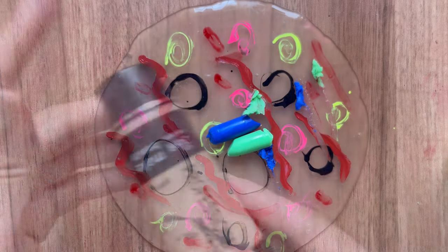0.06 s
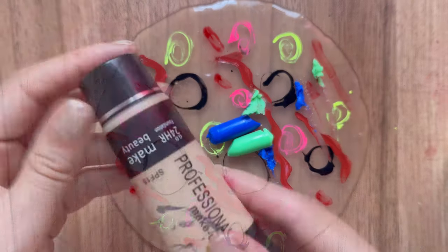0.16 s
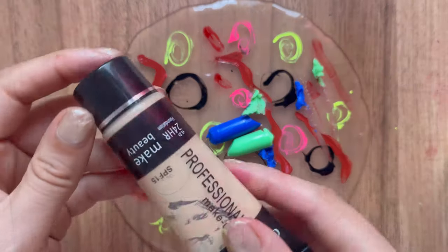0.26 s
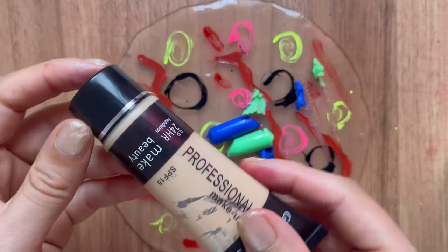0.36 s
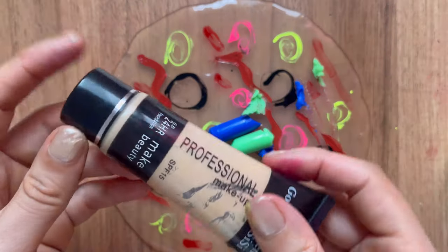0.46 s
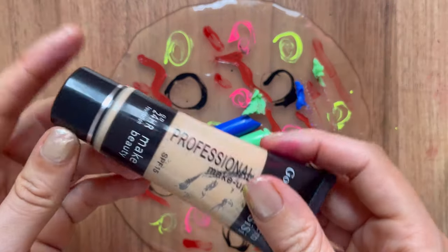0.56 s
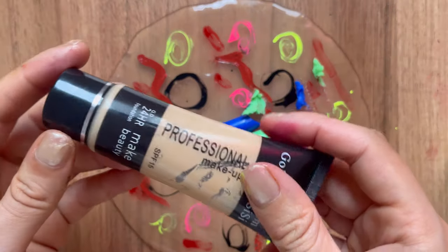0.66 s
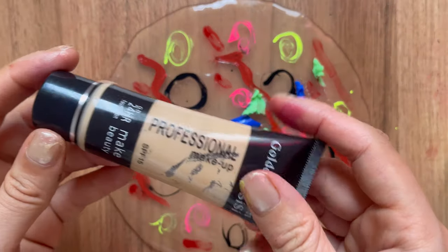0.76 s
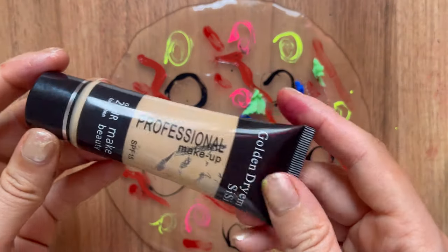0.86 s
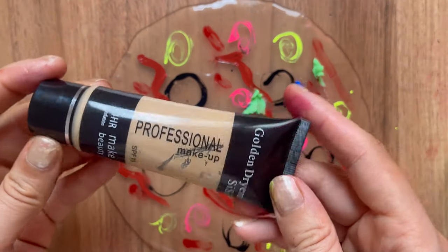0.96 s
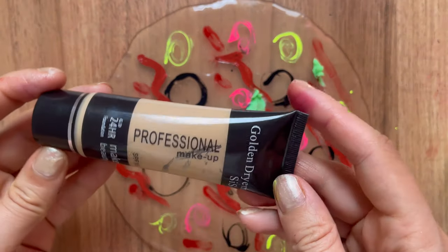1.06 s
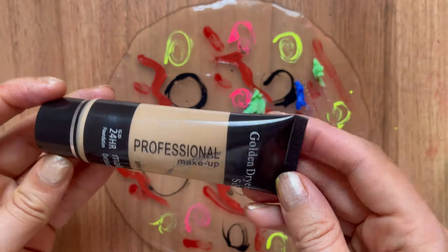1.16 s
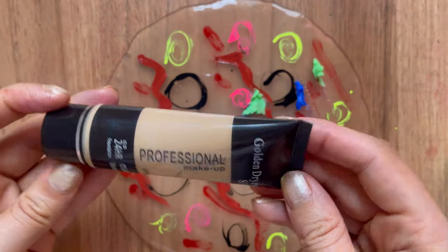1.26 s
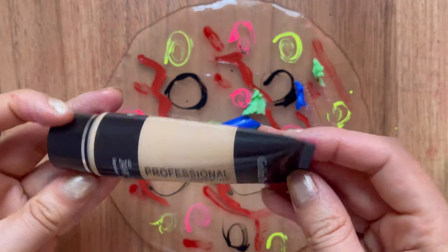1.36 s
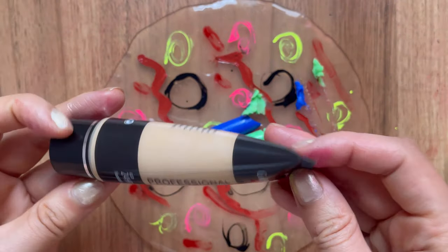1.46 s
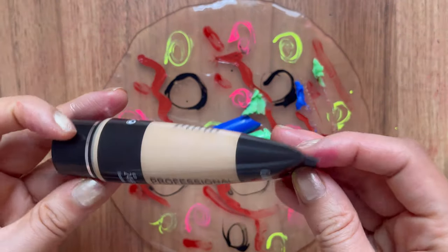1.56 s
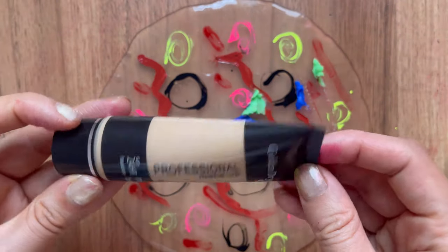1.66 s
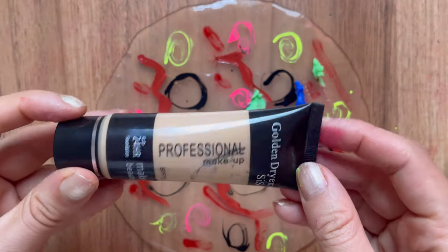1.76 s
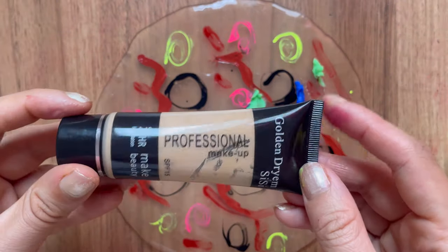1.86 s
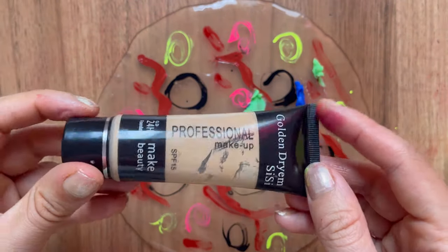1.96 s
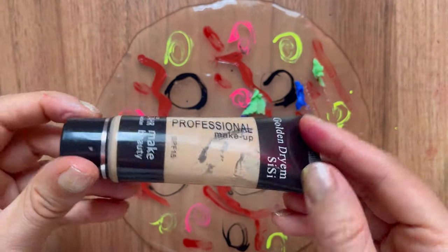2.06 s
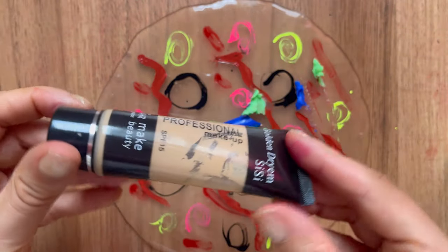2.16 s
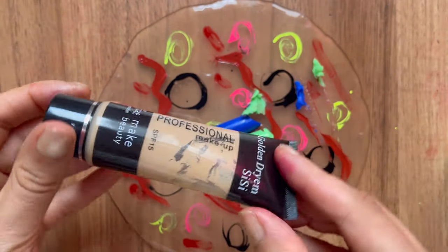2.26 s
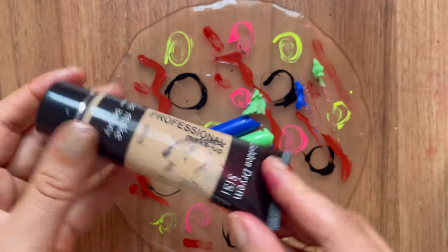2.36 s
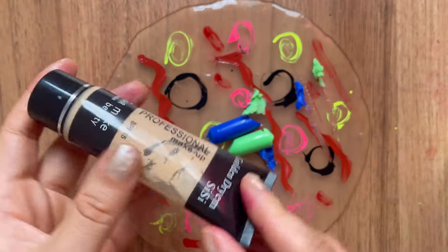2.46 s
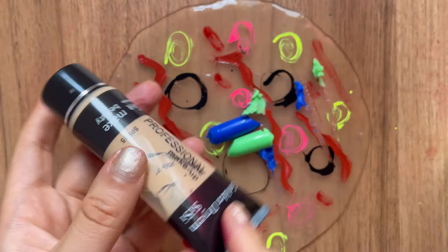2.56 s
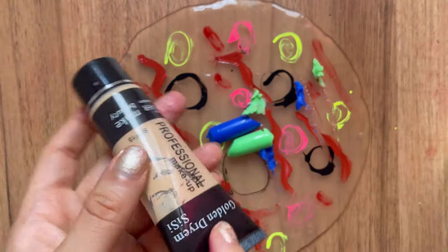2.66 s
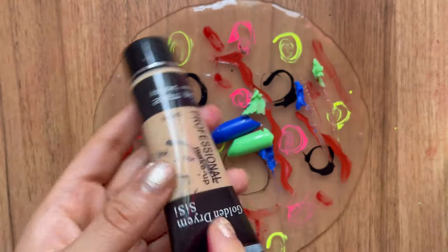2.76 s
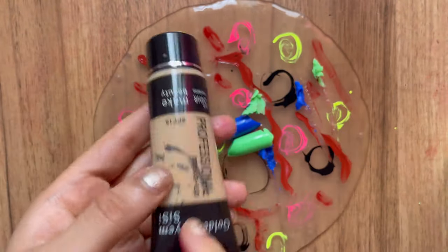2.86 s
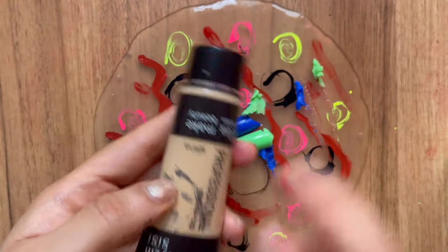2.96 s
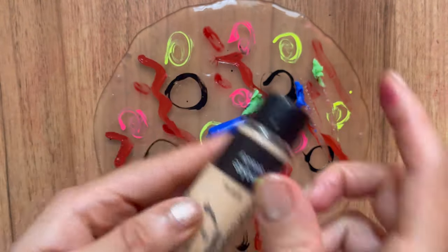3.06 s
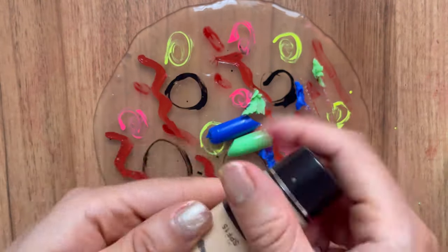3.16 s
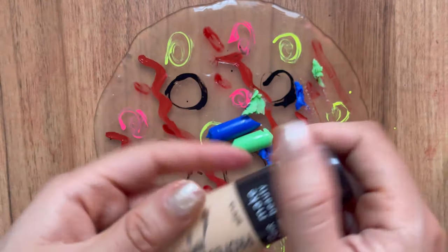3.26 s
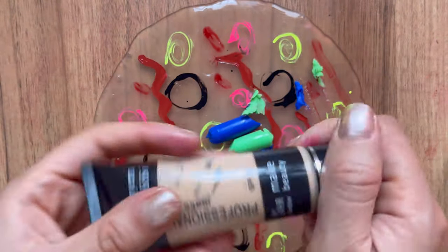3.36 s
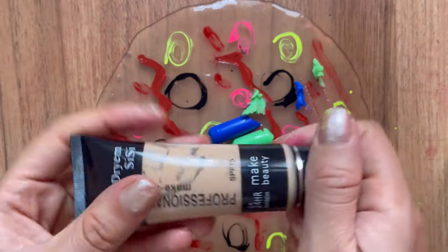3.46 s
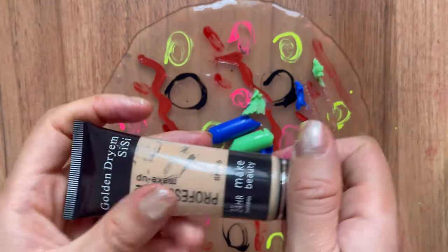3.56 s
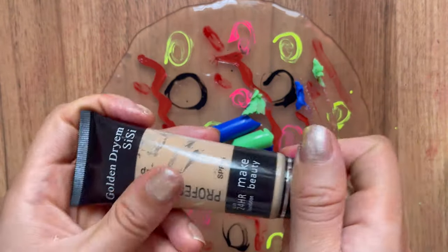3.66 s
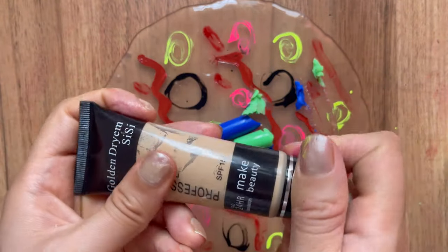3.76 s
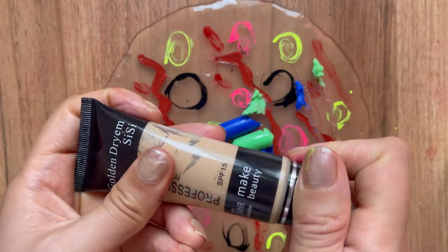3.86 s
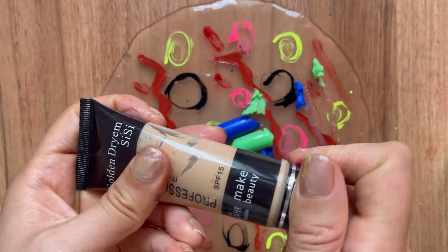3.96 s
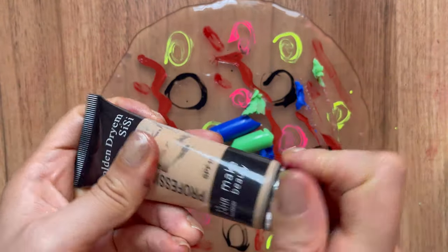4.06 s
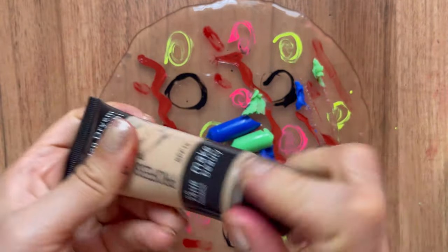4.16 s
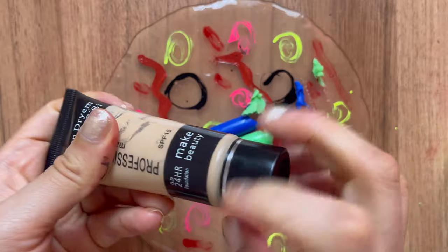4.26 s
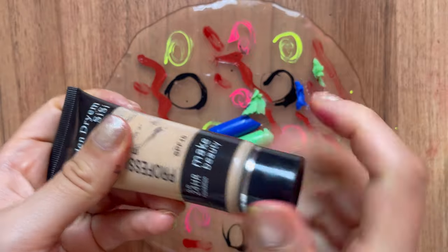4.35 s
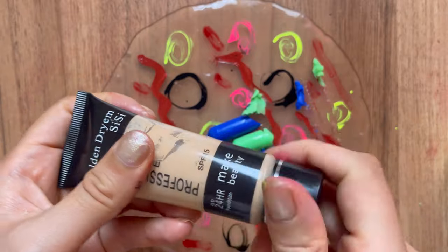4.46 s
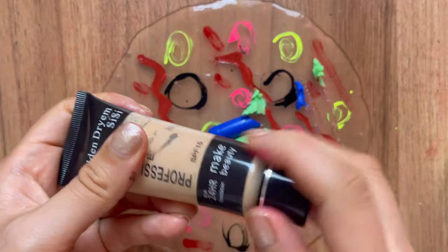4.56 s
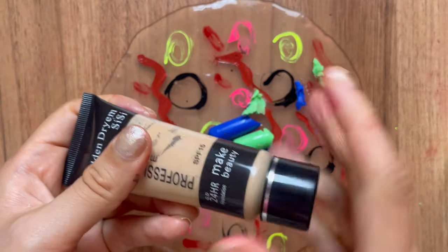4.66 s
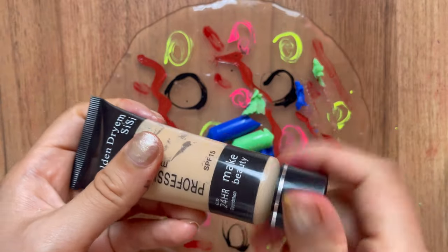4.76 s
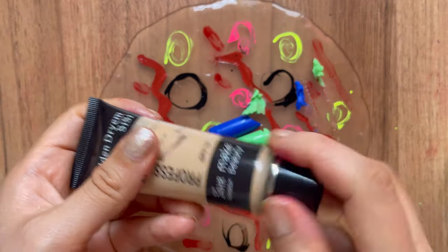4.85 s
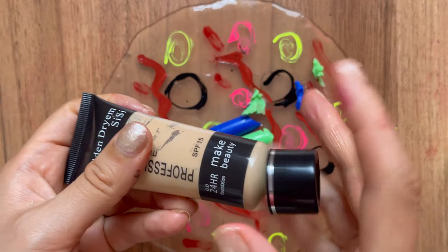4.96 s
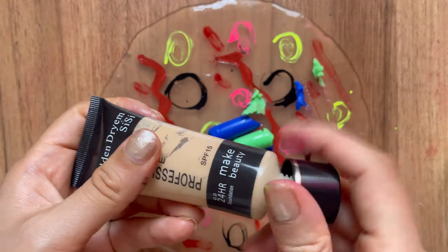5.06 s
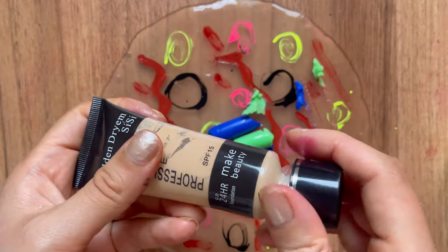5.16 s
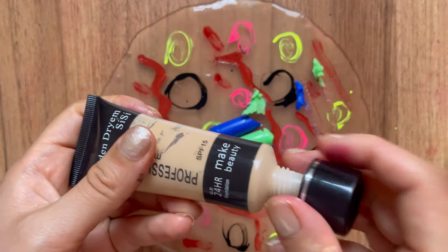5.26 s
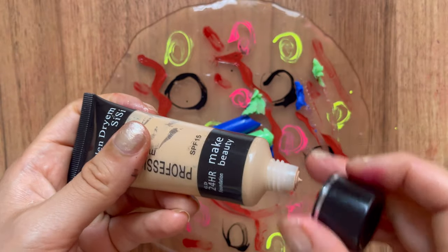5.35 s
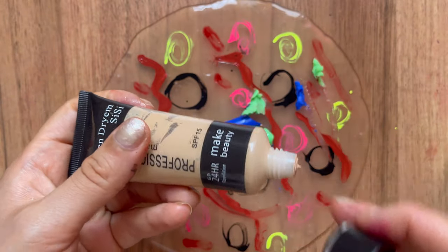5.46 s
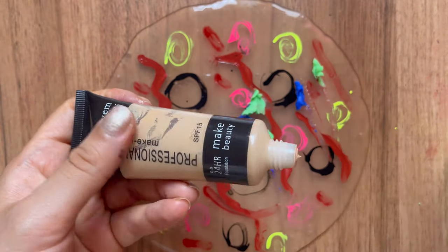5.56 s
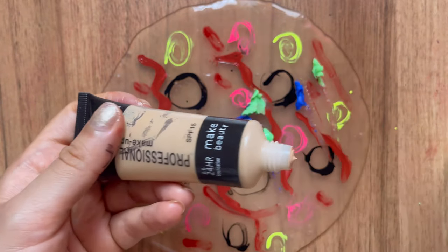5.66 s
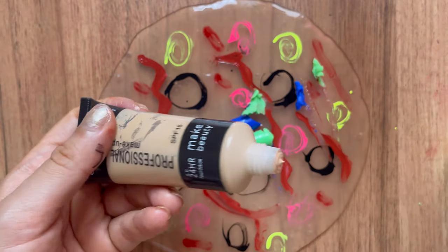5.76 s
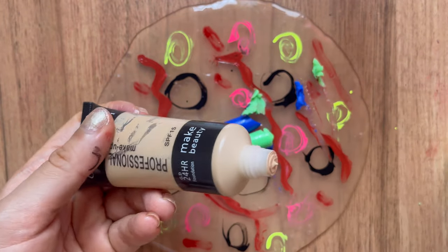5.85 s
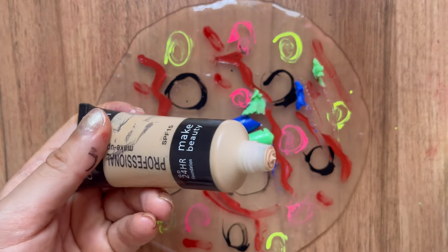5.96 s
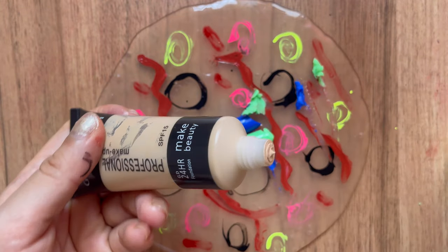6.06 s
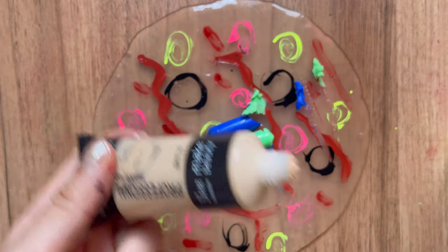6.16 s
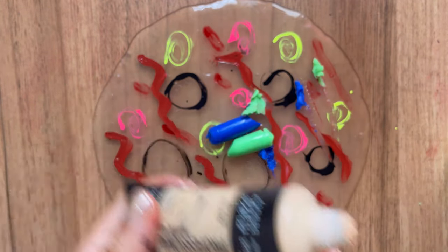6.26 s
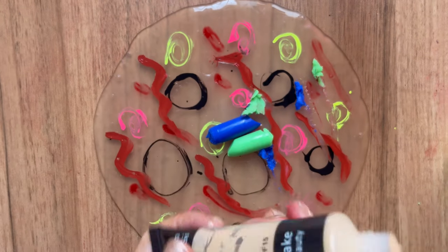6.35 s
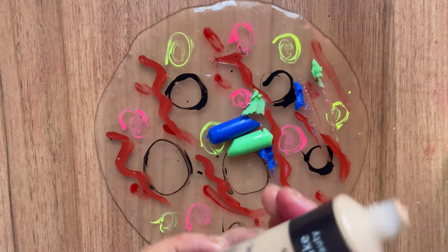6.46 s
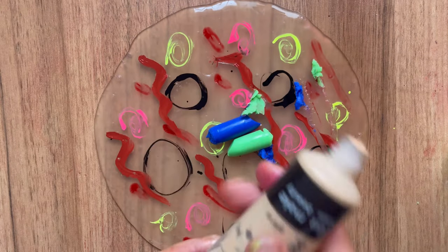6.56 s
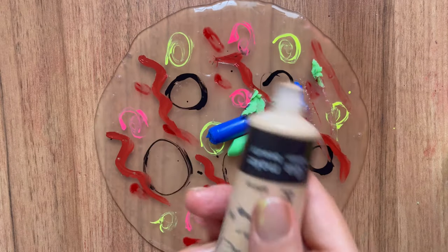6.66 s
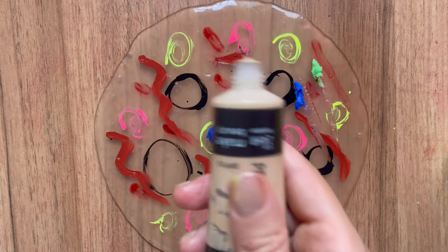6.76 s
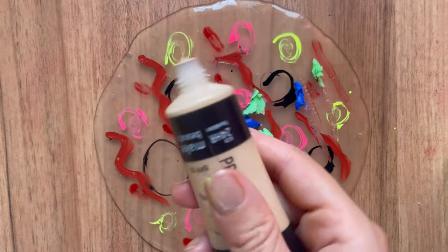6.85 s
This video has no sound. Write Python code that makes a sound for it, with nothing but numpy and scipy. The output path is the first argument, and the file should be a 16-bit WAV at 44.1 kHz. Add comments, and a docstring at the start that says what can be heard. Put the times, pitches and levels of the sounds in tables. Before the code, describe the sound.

Very faint air hiss and low rumble lie under close handling of a plastic makeup tube. Dry skin slides and light nail scuffs lead to one crisp tick, then short thread scrapes and increasingly strong cap clicks. The loudest sound is the cap set down on the table, a hard quick chatter with brief room reflections. Soft rubbing ends it.

```python
"""A soft plastic makeup tube is turned in the hands above a table, heard close by in a quiet room.
Over faint air hiss, fingers slide on it (friction noise) and nails tap and scuff it (dying modes).
A deep hum swells three times; the screw cap scrapes by stick-slip and clicks off its thread (ringing modes).
The cap is set down on the table, where it chatters and rocks flat (struck modes of cap and table top).
A last nail tap and a few slides follow."""
import sys
import numpy as np
from scipy import signal
from scipy.fft import rfft, irfft, next_fast_len
from scipy.io import wavfile
from scipy.ndimage import uniform_filter1d

SR = 44100
rng = np.random.default_rng(int(sys.argv[2]) if len(sys.argv) > 2 else 0)


def store_wav(level_fs):
    """Save 16-bit WAV to argv[1]."""
    pcm = np.round(np.clip(np.atleast_2d(level_fs), -1, 1) * 32767)
    wavfile.write(sys.argv[1], SR, pcm.T.astype(np.int16))


N = 304731
TIME = np.arange(N) / SR  # s

# Modes of the tube, of the cap held in the hand, and of the tube wall and tube neck behind the contacts.
# Each row: frequency in Hz, level in dB, t60 in s. The first row of tube and cap is the note of the hollow.
TUBE_MODES = [(3040, -3, 0.013), (1240, -14.5, 0.0086), (1955, -16.5, 0.0078), (4000, -10, 0.012),
              (5120, -7, 0.013), (6350, -14.5, 0.0095), (8000, -14, 0.0046)]
CAP_IN_HAND_MODES = [(2830, 0.5, 0.0092), (1200, -11, 0.002), (2040, 1, 0.0027), (3970, -18.5, 0.0082),
                     (4400, -28, 0.021), (5000, -8.5, 0.0024), (6400, -9.5, 0.015), (6870, -13.5, 0.011),
                     (11430, -19, 0.019), (12760, -27, 0.005)]
WALL_MODES = [(366, 0.5, 0.017), (554, -2.5, 0.017), (930, -4.5, 0.0061)]
NECK_MODES = [(447, -4.5, 0.011), (863, -3.5, 0.011), (1210, -6.5, 0.01)]


def amp(db):
    """Amplitude ratio of a level: 20 dB for each factor of ten."""
    return 10 ** (np.asarray(db) / 20)


def unit(x):
    """Normalisation of the mean power: rms 1."""
    return x / np.sqrt(np.mean(x ** 2) + 1e-20)


def read(points, hz):
    """Interpolation of a table along a logarithmic frequency axis."""
    point_hz, value = np.transpose(points)
    return np.interp(np.log(hz + 1), np.log(point_hz + 1), value)


def colour(x, spectrum):
    """Spectral shaping: each frequency of x is weighted by the table in dB, then set to rms 1."""
    hz = np.fft.rfftfreq(len(x), 1 / SR)
    return unit(irfft(rfft(x) * amp(read(spectrum, hz)), len(x)))


def band(x, lo_hz, hi_hz, order=2):
    """Causal Butterworth band-pass."""
    sos = signal.butter(order, [lo_hz, hi_hz], "band", fs=SR, output="sos")
    return signal.sosfilt(sos, x)


def add(mix, start_s, sound):
    """Superposition: adds a sound to the mix in place from start_s."""
    part = mix[round(start_s * SR):][:len(sound)]
    part += sound[:len(part)]


def drift(span_s):
    """Random wandering at rms 1: noise under a moving average of span_s."""
    return unit(uniform_filter1d(rng.standard_normal(N), round(span_s * SR)))


def swell(length_s, rise, peakedness):
    """One smooth push: up over the share `rise` of its length, then back to rest; low peakedness is flat-topped."""
    progress = np.linspace(0, 1, round(length_s * SR))
    height = np.interp(progress, [0, rise, 1], [0, 1, 0])
    return np.sin(np.pi / 2 * height) ** peakedness


def grains(size, per_s, spread_db):
    """Stick-slip as random impulses: tiny slips at random moments, a few much larger than the rest."""
    slips = rng.random(size) < per_s / SR
    height = np.minimum(rng.exponential(1, size), 4)
    sign = rng.choice([-1, 1], size)
    return slips * sign * amp(spread_db * height)


def ring(modes, hollow_db=0, tuning=1, spread_db=1, detune=0.034, attack_s=.00008):
    """Modal decay: a sum of dying sines; hollow_db and tuning set the first, chance varies the others."""
    t = TIME[:SR // 20]
    hz, db, t60 = np.array(modes, float).T
    first = np.arange(len(hz)) == 0
    pitch_chance, level_chance = rng.standard_normal((2, len(hz)))
    hz = hz * np.where(first, tuning, 1 + detune * pitch_chance)
    alternating_sign = (-1) ** np.arange(len(hz))
    gain = amp(db + np.where(first, hollow_db, spread_db * level_chance)) * alternating_sign
    decay = np.exp(-np.log(1000) * t / t60[:, None])
    partials = np.sin(2 * np.pi * hz[:, None] * t) * decay
    return gain @ partials * (1 - np.exp(-t / attack_s))


def contacts(rows, modes, backing, crack_s, tuning=None):
    """Impact: each contact rings the object, thuds into what is behind it and cracks at the point of touch."""
    out, t = np.zeros(N), TIME[:SR // 20]
    for start_s, db, hollow_db, thud_db, crack_db in rows:
        burst = rng.standard_normal(len(t)) * np.exp(-t / crack_s)
        crack = band(burst, 1536, 5900, order=1)
        pitch_factor = np.interp(start_s, *np.transpose(tuning)) if tuning else 1
        note = ring(modes, hollow_db, pitch_factor)
        thud = ring(backing)
        add(out, start_s, amp(db) * (note + amp(thud_db) * thud + amp(crack_db) * crack))
    return out


def air_hiss():
    """Stationary coloured noise: room air and hiss, a little lower at first, then steady."""
    # Spectrum of the air, with a thin whine in the hiss. Each row: frequency in Hz, level in dB.
    air_spectrum = [(60, 5.5), (150, -1), (210, 6.5), (270, 1.5), (350, -5), (450, -3.5), (600, -7),
                    (1000, -12), (2000, -17.5), (4850, -19.5), (5080, -12.5), (5350, -21), (7000, -19.5),
                    (9500, -24), (15500, -24.5)]
    # Level of the air over time. Each row: time in seconds, level in dB.
    air_level = [(.3, -68.5), (.62, -66)]
    level_db = np.interp(TIME, *np.transpose(air_level))
    return amp(level_db) * colour(rng.standard_normal(N), air_spectrum)


def rumble(level_db=-52.5, drift_db=1, drift_s=.4):
    """Low-frequency coloured noise whose level drifts slowly."""
    # Spectrum of the rumble. Each row: frequency in Hz, level in dB.
    rumble_spectrum = [(3, -0.5), (8, 11), (16, -3.5), (25, -9.5), (40, -2), (55, -6.5), (75, -17.5),
                       (100, -10), (120, -22.5), (145, -34.5), (220, -56)]
    return amp(level_db + drift_db * drift(drift_s)) * colour(rng.standard_normal(N), rumble_spectrum)


def deep_hum(trim_db=-2.0, hum_hz=35.6, waver_hz=1.15):
    """Frequency modulation: a deep sine wavers in pitch and swells three times."""
    # Swells of the hum. Each row: start in seconds, length in seconds, level in dB before the trim.
    hum_swells = [(3.82, 0.34, -45.5), (4.24, 0.61, -48.5), (4.84, 0.29, -49)]
    phase = 2 * np.pi * np.cumsum(hum_hz + waver_hz * drift(.1)) / SR
    level = np.zeros(N)
    for start_s, length_s, db in hum_swells:
        add(level, start_s, amp(db + trim_db) * swell(length_s, rise=0.44, peakedness=0.67))
    return level * unit(np.sin(phase))


def room(x, wet_db, build_s=0.0043, reflections_per_s=4000):
    """Reverberation of a small room: reflections thicken quickly, then each band dies at its own speed."""
    # Reverberation time of the room. Each row: frequency in Hz, t60 in seconds.
    room_t60 = [(200, 0.61), (1000, 0.34), (2600, 0.42), (6000, 0.27), (14000, 0.36)]
    size = SR // 2
    taps = rng.choice([-1., 1.], size) * (rng.random(size) < reflections_per_s / SR)
    taps *= 1 - np.exp(-TIME[:size] / build_s)
    hz, t, bands = signal.stft(taps, SR, nperseg=256)
    decay = amp(-60 * t / read(room_t60, hz)[:, None])
    tail = signal.istft(bands * decay, SR, nperseg=256)[1]
    return amp(wet_db) * signal.oaconvolve(x, tail / np.linalg.norm(tail))[:N]


def near_echo(x, delay_s, echo_db):
    """Early reflection: the direct sound and its first bounce off a hard surface close by."""
    return x + amp(echo_db) * np.interp(TIME - delay_s, TIME, x, left=0)


def rub(rows, rise, peakedness, slips_per_s=9000, spread_db=3, hump_ratio=1.31,
        hump_db=-2, skin_db=6.5, light_grip_hz=6500, focus_db=4):
    """Dry friction: dense micro-slips of skin on plastic swell and fade around a hump of hiss."""
    # Spectra of the broad friction noise and of the dry fizz. Each row: frequency in Hz, level in dB.
    skin_spectrum = [(100, -23), (400, -4), (1000, -3), (2000, 1), (5000, 2), (7500, 0), (9500, -11.5),
                     (12000, -15.5), (16000, -26.5)]
    fizz_spectrum = [(3000, -41.5), (8000, -10.5), (10000, -5), (12000, -2), (14000, -9), (16000, -18.5)]
    out = np.zeros(N)
    for start_s, length_s, db, centre_hz, fizz_db in rows:
        speed = swell(length_s, rise, peakedness)
        slips = grains(N // 2, slips_per_s, spread_db)[:next_fast_len(len(speed))]
        hump = unit(band(slips, centre_hz / hump_ratio, centre_hz * hump_ratio))
        # the hump stands out by focus_db more per octave away from the hiss of a light grip
        octaves = abs(np.log2(light_grip_hz / centre_hz))
        hiss = amp(hump_db + focus_db * octaves) * hump
        hiss += amp(skin_db) * colour(slips, skin_spectrum)
        hiss += amp(fizz_db) * colour(slips, fizz_spectrum)
        add(out, start_s, amp(db) * speed * unit(hiss)[:len(speed)])
    return out


def fingers(judder_db=1, judder_s=0.0047, regrip_db=3.5, regrip_s=0.08):
    """Modulated friction: slides over the uneven rustle of the rolling tube; the skin judders in both."""
    # Finger slides, then rolls of the tube in the grip. Each row: start in seconds, length in seconds,
    # level in dB before judder and regrip, centre of the hiss in Hz, dry fizz in dB.
    slide_rows = [(.62, 0.22, -75, 3250, -9), (.788, .058, -67.5, 3100, 12), (1.34, .15, -74, 7500, -1),
                  (1.935, .11, -67, 4600, -3), (2.25, 0.2, -69, 7200, 2.5), (2.59, 0.21, -70, 7200, 2.5),
                  (2.786, 0.038, -58, 5300, 4), (2.975, .16, -70, 6400, 4), (3.12, 0.26, -62.5, 5940, 5),
                  (3.225, .07, -67, 2400, -6), (3.41, .16, -68.5, 3550, -1), (3.652, 0.053, -70, 5000, -6),
                  (3.925, 0.15, -61, 4400, -1), (4.02, .16, -59, 6000, 4), (4.065, .08, -61.5, 12900, 21),
                  (4.435, .13, -62.5, 6400, 5), (4.77, .1, -63.5, 6640, -3), (5.46, .07, -68.5, 11600, 5),
                  (6.332, 0.12, -61.5, 6400, -3.5), (6.465, 0.14, -68.5, 6500, 0),
                  (6.71, .18, -72.5, 6400, -3)]
    roll_rows = [(.55, 3.3, -84, 3230, -3), (1.6, .27, -79.5, 7400, -9), (6.25, 0.25, -74, 7500, -0.5)]
    slides = rub(slide_rows, rise=0.34, peakedness=1.55)
    rolls = rub(roll_rows, rise=0.85, peakedness=0.27) * amp(regrip_db * drift(regrip_s))
    return (slides + rolls) * amp(judder_db * drift(judder_s))


def scuffs(slips_per_s=900, spread_db=-1.0, wall_db=-6, body_db=-3):
    """Stick-slip of a nail on the tube wall: quick slips knock ever harder until the nail lets go."""
    # Stutters of the nail. Each row: start in seconds, end in seconds, level in dB,
    # hollow note in dB, factor on the hollow pitch.
    scuff_rows = [(0.78, 0.816, -73, -8, 0.85), (1.785, 1.821, -68, 2, 0.86), (1.905, 1.92, -70.5, 8, 0.8),
                  (2.782, 2.812, -59, 2, 1)]
    out = np.zeros(N)
    for start_s, end_s, db, hollow_db, tuning in scuff_rows:
        size = round((end_s - start_s) * SR)
        slips = grains(N // 10, slips_per_s, spread_db)[:size] * np.linspace(.3, 1, size)
        knock = ring(TUBE_MODES, hollow_db, tuning) + amp(wall_db) * ring(WALL_MODES)
        creak = unit(signal.oaconvolve(slips, knock))
        creak = creak + amp(body_db) * unit(band(creak, 760, 2430))  # the soft wall favours the low mids
        # the level counts over the scuff alone, not over its ringing tail
        add(out, start_s, amp(db) * unit(creak) * np.sqrt(size / len(creak)))
    return out


def nail_taps():
    """Impact of nails on a hollow tube: its modes ring before the duller tube wall."""
    # Taps. Each row: start in seconds, level in dB before the mix, then relative to it
    # hollow note in dB, dull thud in dB, sharp crack in dB.
    tap_rows = [(.812, -67, -2, -10, -2), (1.082, -62.5, 5, -2, 10.5), (1.988, -53.5, -12, 3.5, -8),
                (2.8132, -53, 6, -7, 11), (3.0368, -33, -15, -10.5, -17), (3.0763, -51, -2, 5, 9),
                (4.378, -62.5, 9, -6, 10), (4.381, -59, 6, 7, 15.5), (5.478, -59, -12, -12, 5),
                (6.2638, -46.5, -10, -8, -1.5)]
    return contacts(tap_rows, TUBE_MODES, WALL_MODES, crack_s=0.0016)


def thread_twists(spread_db=5.0, wander=0.046, count=8, neck_db=3, grit_db=-15, grit_per_s=700):
    """Stick-slip in the screw thread: slips ring the cap at slightly different pitches over a dry grit."""
    # Twists of the cap. Each row: start in seconds, length in seconds, level in dB before the mix,
    # slips per second, hollow note in dB.
    twist_rows = [(4.126, .11, -62.5, 160, 13), (4.369, .04, -58.5, 350, 2), (4.45, 0.15, -60.5, 400, -2),
                  (4.709, 0.13, -58, 340, -4), (4.826, 0.043, -47.5, 1500, -10),
                  (4.912, 0.14, -51.5, 300, -7)]
    out = np.zeros(N)
    for start_s, length_s, db, slips_per_s, hollow_db in twist_rows:
        speed = swell(length_s, rise=0.28, peakedness=0.55)
        scrape = 0
        for step in np.linspace(-1, 1, count):
            note = ring(CAP_IN_HAND_MODES, hollow_db, 0.98 + wander * step)
            note = note + amp(neck_db) * ring(NECK_MODES)
            slips = grains(SR // 2, slips_per_s / count, spread_db)
            scrape = scrape + signal.oaconvolve(slips, note)
        grit = band(grains(SR // 2, grit_per_s, spread_db), 5000, 14000, order=1)
        size = len(speed)
        add(out, start_s, amp(db) * speed * (unit(scrape[:size]) + amp(grit_db) * unit(grit[:size])))
    return out


def thread_clicks():
    """Impact of the thread's strongest catches: the cap's modes ring before the tube neck."""
    # Catches. Each row: start in seconds, level in dB, then relative to it
    # hollow note in dB, dull thud in dB, sharp crack in dB.
    click_rows = [(4.0853, -46.5, -3, -7.5, -7), (4.4462, -48.5, 2, -4, -15),
                  (4.4913, -42.5, -2.5, -5.5, -14), (4.5507, -41.5, 2, 0.5, -30),
                  (4.5588, -42.5, -7, -6, -21), (4.7127, -31.5, -10, 1.5, -8), (4.7212, -36, -1.5, 8, -0.5),
                  (4.7472, -47, 4, -10.5, -13), (4.779, -37.5, -18, -11, -15), (4.8538, -37.5, -4, 0, -4),
                  (4.877, -23, 4.5, -18, -4.5), (4.9283, -34.5, -8, 2, -19), (4.9488, -39, -7, 2, -16),
                  (4.982, -35, 5.5, -4, -13), (4.9868, -28.5, 1.5, -5.5, -12)]
    # The cap's hollow note rises as it backs off the neck. Each row: time in seconds, factor on its pitch.
    cap_tuning = [(4.65, 0.917), (5.0, 1.037)]
    return contacts(click_rows, CAP_IN_HAND_MODES, NECK_MODES, crack_s=0.0019, tuning=cap_tuning)


def table_knocks():
    """Impact of the cap on the table: a softer striker than nail or thread excites less top treble."""
    # Knocks of the cap. Each row: start in seconds, level in dB, then relative to it
    # hollow note in dB, dull thud in dB, sharp crack in dB.
    knock_rows = [(5.7802, -18.5, -1, -10, -12), (5.78434, -23, 6.5, -10, -24),
                  (5.78558, -14, -15.5, -13, -31), (5.7864, -30, 5.5, -25.5, -17),
                  (5.8585, -46, -15, 6.5, -20), (5.8682, -38.5, 0.5, 8.5, -26)]
    # Modes of the cap on the table (first its hollow note), then of the table top.
    # Each row: frequency in Hz, level in dB, t60 in seconds.
    cap_modes = [(2482, 4.5, 0.012), (850, -8, 0.0073), (1442, -4.5, 0.01), (1994, -18, 0.0091),
                 (3040, -8.5, 0.0058), (3550, -7, 0.0041), (4450, -10, 0.01), (5000, -16, 0.0079),
                 (5940, -14.5, 0.012), (11600, -22, .006)]
    table_modes = [(753, -6.5, 0.01), (589, -10.5, 0.013), (930, -2, 0.014), (1345, 2, 0.012),
                   (1720, -2.5, .009), (180, -19, 0.034)]
    return band(contacts(knock_rows, cap_modes, table_modes, crack_s=0.0011), 82, 7600)


def scene():
    """Superposition of the hands and cap above the table, the cap landing on it, and the room."""
    background = air_hiss() + rumble() + deep_hum()
    slides = fingers()
    plastic = scuffs() + amp(-2.5) * nail_taps() + amp(-7.5) * thread_twists() + thread_clicks()
    plastic = band(plastic, 260, 21000, order=1)
    held = near_echo(plastic, delay_s=0.001417, echo_db=-9.0) + slides
    held = held + room(plastic + slides, wet_db=-17)
    knocks = table_knocks()
    landed = knocks + room(knocks, wet_db=-13.5)
    return (background + held + landed)[None]


def record(dry, edge_hz=15900):
    """Band limitation: a linear-phase low-pass removes what lies above edge_hz."""
    low_pass = signal.firwin(255, edge_hz, window=("kaiser", 8), fs=SR)
    return signal.oaconvolve(dry, low_pass[None], "same")


dry = scene()
out = record(dry)
store_wav(out)
```